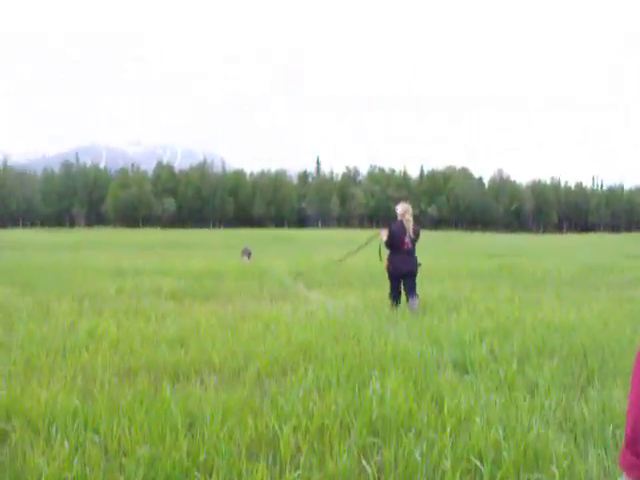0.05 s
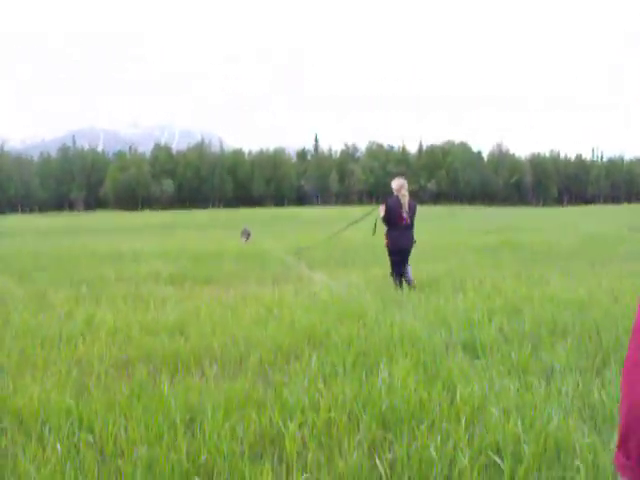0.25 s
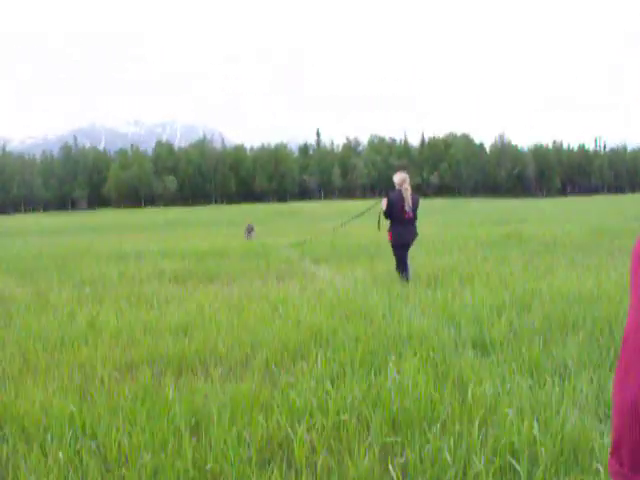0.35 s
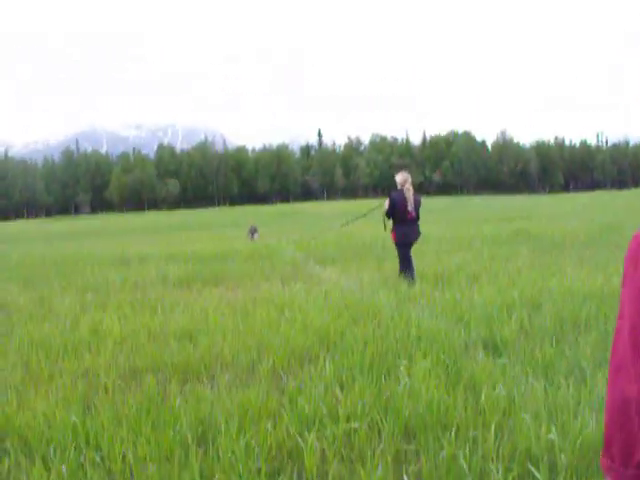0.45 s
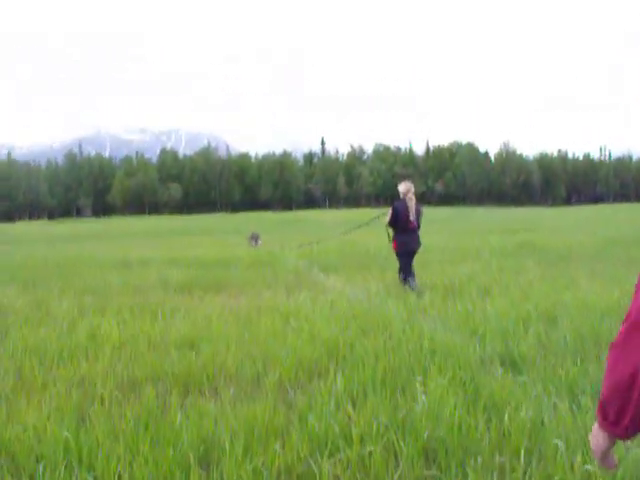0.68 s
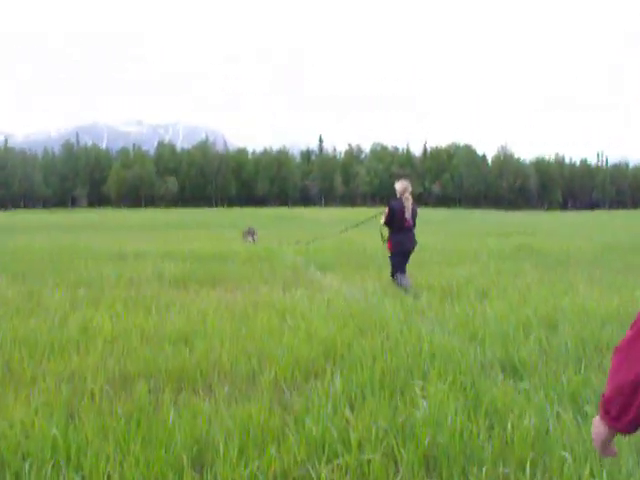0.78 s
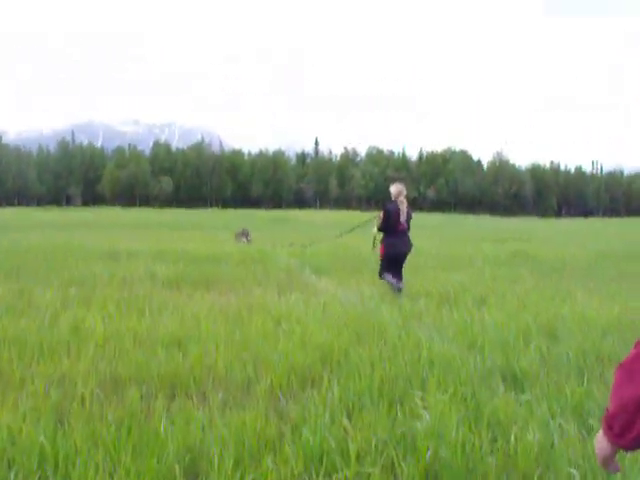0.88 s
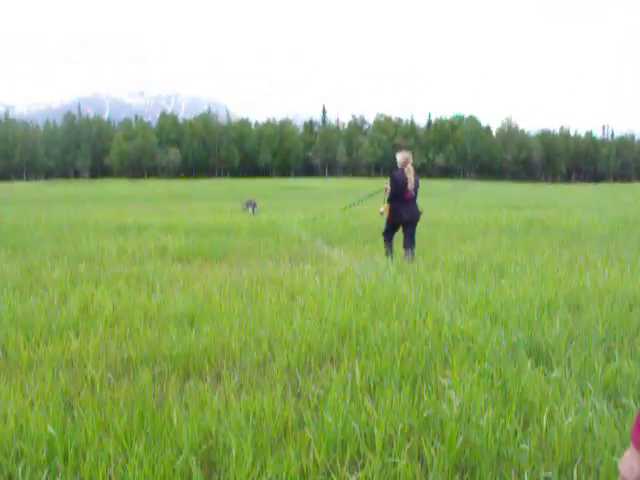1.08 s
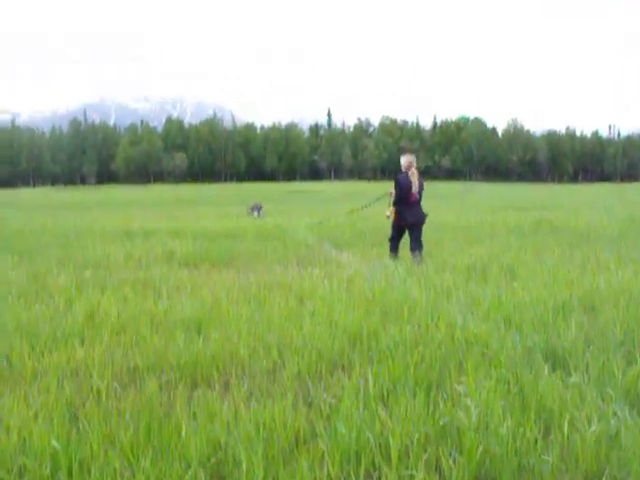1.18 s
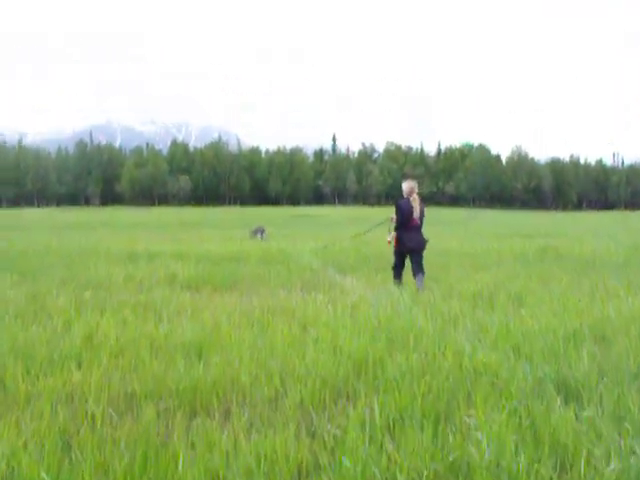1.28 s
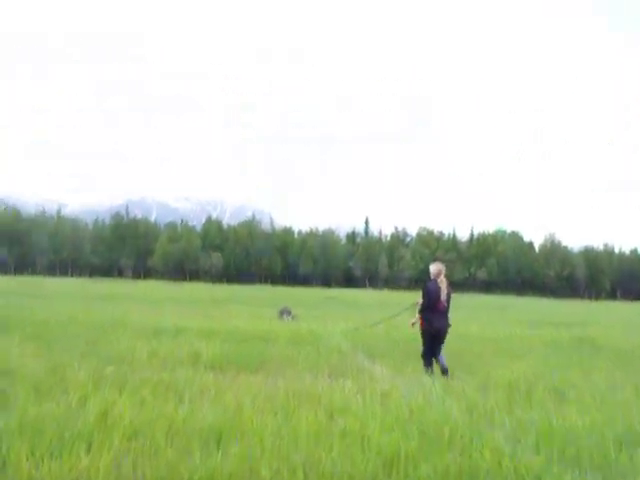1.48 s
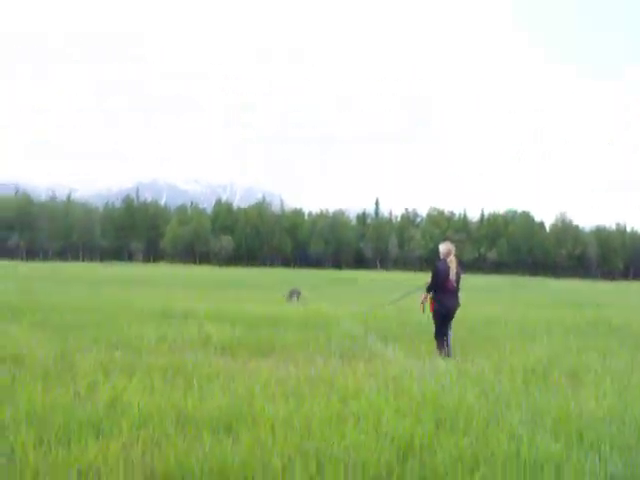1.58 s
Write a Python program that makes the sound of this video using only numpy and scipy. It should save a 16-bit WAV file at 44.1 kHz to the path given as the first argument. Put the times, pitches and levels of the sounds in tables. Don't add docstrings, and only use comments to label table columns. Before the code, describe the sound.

Grass stems scratch and snap right beside a cheap camera microphone, first two harsh bursts, then a softer brush and small flicks, over a constant grassy hiss and thin buzz, with faint bird whistles outdoors.

```python
import sys
import numpy as np
from scipy import signal
from scipy.fft import rfft, irfft, next_fast_len
from scipy.io import wavfile
from scipy.ndimage import uniform_filter1d, map_coordinates

SR = 44100
rng = np.random.default_rng(int(sys.argv[2]) if len(sys.argv) > 2 else 0)


def natural_amplitude(level_db):
    exponent = np.asarray(level_db, float) / 20
    return 10 ** exponent


def wrap_up_sound(samples):
    columns = np.atleast_2d(samples).T
    tamed = np.clip(columns, -1, 1)
    steps = np.round(tamed * 32767).astype(np.int16)
    wavfile.write(sys.argv[1], SR, steps)


N = 72765

# pitch_hz, level_db
BRIGHT_MODES = [(4100, -7.5), (4450, -2), (4850, 1), (5170, -1)]
# pitch_hz, gain_db
SHELL_THINNING = [(300, -25), (900, -4), (1700, -13.5), (2100, 2)]
# centre_s, peak_db
STEM_CRACKS = [(.24233, 2), (.24789, 1), (.2497, -4), (.27302, -6), (.27748, -5), (.40425, -.5),
               (.5324, -1), (.5336, .5), (.53644, -4), (.53921, 1), (.54073, 0), (.54345, -3.5),
               (.54537, -1), (.5482, -8), (.55007, -10), (.55687, -8), (.56054, -14), (.56542, -14),
               (.9641, -3.5), (.97086, -5.5), (1.181, -10), (1.64464, -12), (1.6501, -16)]


def unit(x):
    return x / np.sqrt(np.mean(x ** 2) + 1e-20)


def coloured(x, points):
    size = next_fast_len(N + 8192)
    hz, db = np.transpose(points)
    log_hz = np.log(np.fft.rfftfreq(size, 1 / SR) + 1)
    gain = natural_amplitude(np.interp(log_hz, np.log(hz), db))
    return irfft(rfft(x, size) * gain, size)[:N]


def wobble(rate):
    knots = rng.standard_normal(int(N * rate / SR) + 4)
    return map_coordinates(knots, [np.arange(N) * rate / SR])


def add(track, s, x):
    part = track[max(round(s * SR), 0):][:len(x)]
    part += x[:len(part)]


def buzz():
    # multiple of the buffer rate, level_db
    tones = [(2, -61.5), (4, -59), (5, -56), (6, -58), (7, -62), (8, -72.5)]
    buffer_samples, whine_hz, whine_db = 512, 5010, -55
    n = np.arange(N)
    low = np.zeros(N)
    for k, db in tones:
        phase = 2 * np.pi * (round(k) * n / buffer_samples + rng.random())
        low += natural_amplitude(db + 0.53 * wobble(8.9)) * np.sin(phase)
    whine = natural_amplitude(whine_db + 0.7 * wobble(1.9)) * np.sin(2 * np.pi * whine_hz * n / SR)
    return np.sqrt(2) * (low + whine)


def wind():
    # centre_s, level_db, pitch_hz
    bumps = [
        (0.22, -33.5, 46),
        (1.21, -40, 30),
        (1.421, -38.5, 27.5),
        (1.57, -47, 29.3),
        (1.62, -41, 40),
    ]
    out = np.zeros(N)
    for s, db, hz in bumps:
        cycles = np.arange(-SR // 20, SR // 20) / SR * hz
        add(out, s - .05, natural_amplitude(db) * np.exp(-3 * cycles ** 2) * np.sin(-2 * np.pi * cycles))
    return out


def birds():
    # start_s, length_s, start_hz, end_hz, level_db
    calls = [
        (.66, .05, 4900, 5350, -48),
        (.74, .04, 4850, 5350, -48),
        (.838, .025, 5330, 5330, -46),
        (.915, .022, 5350, 5280, -46),
        (1.252, .025, 5200, 5180, -44),
        (1.34, .05, 5450, 4500, -46),
        (1.455, .045, 5200, 4250, -47),
        (1.558, .055, 5450, 4180, -45),
    ]
    out = np.zeros(N)
    for s, length, start_hz, end_hz, db in calls:
        u = np.linspace(0, 1, round(length * SR))
        hz = end_hz + (start_hz - end_hz) * (1 - u) ** 1.5
        whistle = np.sin(2 * np.pi * np.cumsum(hz) / SR)
        add(out, s, natural_amplitude(db) * np.sin(np.pi * u) ** .6 * whistle)
    return out * natural_amplitude(3 + 3 * wobble(90))


def grass():
    # time_s, level_db
    swell = [
        (0.0, -36.5),
        (0.294, -40),
        (0.394, -35),
        (0.776, -37),
        (1.015, -38.5),
        (1.138, -34.5),
        (1.378, -37),
        (1.65, -37),
    ]
    # pitch_hz, gain_db
    hiss_colour = [(25, -4.5), (110, -7), (500, -3.5), (1050, -1.5), (2100, -6), (3700, -6.5), (4700, -6.5),
                   (5500, -2.5)]
    crackle = rng.standard_normal(N) * natural_amplitude(1.32 * wobble(400))
    z = signal.stft(crackle, nperseg=512)[2]
    patches = uniform_filter1d(rng.standard_normal(z.shape), size=6, axis=0)
    patches = uniform_filter1d(patches, size=8, axis=1)
    patchy = signal.istft(z * natural_amplitude(1.18 * unit(patches)), nperseg=512)[1][:N]
    hiss = coloured(patchy, hiss_colour + [(6000, -57)])
    s, db = np.transpose(swell)
    return unit(hiss) * natural_amplitude(np.interp(np.arange(N) / SR, s, db) + 1.5 * wobble(11.58))


def ringing(modes, t, t60, rise):
    scatter_db, detune = 2.5, .025
    chance = rng.standard_normal((len(modes), 2))
    tones = np.zeros(len(t))
    for (hz, db), (a, b) in zip(modes, chance):
        tones += natural_amplitude(db + scatter_db * a) * np.sin(2 * np.pi * hz * (1 + detune * b) * t)
    return (1 - np.exp(-t / rise)) * natural_amplitude(-60 * t / t60) * tones


def gripped(hz):
    # pitch_hz, level_db
    dull_modes = [(2200, -6), (2450, -2), (2670, 0), (2920, -1), (3200, 0), (3420, -8)]
    grip_wide_hz, grip_db = 520, 8
    return [(f, db - grip_db * ((f - hz) / grip_wide_hz) ** 2) for f, db in dull_modes]


def shell_bass(low):
    return coloured(low, [(120, -23.5), (350, -1.5)])


def knocks():
    # pitch_hz, level_db
    knock_modes = [(330, -10), (630, -6), (1000, 0), (1170, -4)]
    # pitch_hz, level_db
    thump_modes = [(270, -6), (350, -4), (630, 0), (1000, -10), (1250, -5)]
    # start_s, peak_db
    taps = [
        (0.2438, -15.5),
        (0.35, -27.5),
        (.366, -32.5),
        (0.726, -25.5),
        (0.966, -25),
        (1.009, -23.5),
        (1.213, -35),
        (1.237, -21.5),
        (1.646, -20),
    ]
    # start_s, peak_db
    heavy_blows = [
        (.4974, -25),
        (0.502, -13.5),
    ]
    out, t = np.zeros(N), np.arange(SR // 20) / SR
    for modes, events in ((knock_modes, taps), (thump_modes, heavy_blows)):
        for s, db in events:
            knock = ringing(modes, t, 0.023, 0.00051)
            add(out, s - .001, natural_amplitude(db) * knock / np.abs(knock).max())
    return shell_bass(out)


def scrapes():
    # start_s, length_s, level_db, grip_hz
    rubs = [(0.25, 0.011, -31, 2300), (.326, .022, -38, 2900), (0.277, 0.011, -35, 2600),
            (.296, 0.025, -31.5, 2770), (0.385, 0.031, -28, 2800), (0.433, 0.0062, -42.5, 3020),
            (0.964, 0.014, -37.5, 2640), (0.979, 0.019, -32, 2100), (0.996, 0.034, -34, 2400),
            (1.022, 0.047, -29, 2950), (1.103, 0.013, -41, 2680), (1.168, 0.017, -32, 2940)]
    out, t = np.zeros(N), np.arange(SR // 50) / SR
    for s, length, db, hz in rubs:
        u = np.linspace(0, 1, round(length * SR))
        noise, patches = rng.standard_normal((2, SR // 10))
        grit = noise * natural_amplitude(3.1 * unit(uniform_filter1d(patches, size=40)))
        push = np.sin(np.pi * u) ** 0.77 * grit[:len(u)]
        dull, bright = [unit(np.convolve(push, ringing(modes, t, .012, 0.00022)))
                        for modes in (gripped(hz), BRIGHT_MODES)]
        add(out, s, natural_amplitude(db) * (dull + natural_amplitude(-6) * bright))
    return coloured(out, SHELL_THINNING)


def cracks():
    kicked_hz = (2800, 4800)
    shares = (.56, .44)
    rise_s, fall_s = .0003, .00055
    out, hush = np.zeros(N), np.zeros(N)
    u = np.arange(-66, 66) / SR
    shape = np.exp(-(u / np.where(u < 0, rise_s, fall_s)) ** 2)
    kick = shape * (shares @ np.cos(2 * np.pi * np.outer(kicked_hz, u)))
    for s, db in STEM_CRACKS:
        add(out, s + u[0], -natural_amplitude(db) * kick)
        add(hush, s + u[0], shape)
    return out, np.clip(hush, 0, 1)


def slips():
    # loudest_s, peak_db, bright_over_dull_db, length_ms
    catch = [(0.2423, -3, 2, 1.2), (0.2478, -4, 2, 0.8), (0.2496, -7, 0, 0.7), (0.2554, -18, -4, 2.3),
             (0.2604, -22, -12, 0.9), (0.2698, -18, -3, 2.6), (0.2731, -9, -5, 1.3),
             (0.2753, -13, -10, 0.8), (0.2777, -9, -3, 1.8), (0.2841, -20, -10, 1.9),
             (0.2894, -15, -15, 1.2), (0.2988, -12, -7, 1.1), (0.3019, -15, -15, 0.8),
             (0.3044, -10, -9, 1.6), (0.3083, -7, -14, 1.5), (0.312, -20, -10, 0.9),
             (0.3142, -16, -16, 0.9), (0.3185, -14, -11, 0.8), (0.3209, -11, -9, 1.1),
             (0.3489, -16, -12, 1.0), (0.3757, -12, -14, 2.3), (0.3925, -8, -17, 3.5),
             (0.3973, -18, -19, 0.8), (0.3997, -10, -14, 1.2), (0.4043, -3, -14, 1.3),
             (0.408, -7.5, -16, 1.0), (0.4105, -19, -8, 0.7), (0.413, -19, -17, 1.2),
             (0.4165, -23, -10, 1.1), (0.4237, -17, -14, 1.3)]
    tear = [(.4922, -19, -11, .8), (.4942, -14, -9, 1), (.4965, -2, -7, 1.5), (.4983, -3, -6, 1.5),
            (.5011, -2, -3, 1.5), (.5028, -3, -4, 1), (.5059, -9, -10, 1), (.5093, -7, -4, 1.6),
            (.5112, -9, -6, 1), (.514, -12, -8, 1.2), (.5169, -17, -7, 1), (.528, -12, -9, 2),
            (.5324, -4, -6, 1), (.5335, -4, -5, .6), (.5364, -8, -5, .7), (.5391, -4, -5, .5),
            (.5407, -4.5, -5, .4), (.5433, -7, -5, .4), (.5453, -4.5, -5, .4), (.5481, -11, -4, .6),
            (.5502, -14, -6, .5), (.5525, -17, -8, 2), (.5569, -13, -3, .4), (.5606, -18, -2, .4),
            (.5654, -21, -1, .6)]
    brush = [(0.9641, -9, 4, 1.0), (0.9708, -12, 2, 0.9), (0.9727, -14, 0, 0.8), (0.9769, -19, -2, 1.0),
             (0.9874, -15, -4, 2.8), (0.9924, -21, -6, 0.9), (1.003, -19, -6, 1.1), (1.0063, -14, -8, 1.4),
             (1.0116, -21, -2, 1.9), (1.0181, -16, -6, 1.2), (1.0226, -18, -4, 0.9), (1.028, -19, -4, 1.5),
             (1.0318, -19, -4, 1.2), (1.0361, -21, -6, 1.8), (1.0414, -21, -9, 0.9), (1.0473, -18, -1, 3.6),
             (1.0515, -18, -5, 0.8), (1.055, -16, -4, 1.3), (1.0762, -17, -6, 2.0), (1.0803, -12, -4, 1.1)]
    flick = [
        (1.1111, -21, -8, 2.9),
        (1.171, -12, -11, 1.0),
        (1.1745, -14, -6, 0.7),
        (1.1781, -20, -13, 0.7),
        (1.181, -14, -4, 1.0),
        (1.1855, -21, 0, 0.8),
        (1.6447, -12, 4, 1.3),
    ]
    grips_hz = [
        [2490, 2690, 2950, 2490, 2430, 2370, 2570, 2430, 2440, 2950, 2840, 3160, 2750, 2640, 3060, 2940, 2710,
         2620, 2800, 2920, 3100, 2510, 2900, 2840, 2870, 2800, 3160, 3130, 3090, 3000],
        [2730, 2610, 3080, 2730, 3200, 2720, 3010, 2590, 2470, 3300, 2500, 2390, 2670, 2650, 2700, 2800, 2750,
         2830, 2780, 2670, 2810, 2440, 2430, 2560, 2510],
        [2790, 2760, 3050, 2710, 2470, 2220, 3290, 2730, 2570, 2710, 2990, 2850, 3110, 3020, 2720, 3320, 2980,
         2930, 2750, 3140],
        [2800, 2770, 2970, 2780, 2860, 3020, 3280],
    ]
    # pitch_hz, level_db
    deep_modes = [(1000, -0.5), (1300, -34.5), (1700, 1.5)]
    deep_levels = [-19, -23.5, -9, -18.5]
    forces = [0, .5, .5, 1]
    drags = [-17, -14, -11, -13]
    dull_t60, bright_t60, deep_t60, drag_t60 = .009, .005, .015, .03
    lead, snap, damping_db = .008, 4, 14
    left_db = -2.5
    high, low, t = np.zeros(N), np.zeros(N), np.arange(SR // 20) / SR
    strokes = zip((catch, tear, brush, flick), deep_levels, forces, drags, grips_hz)
    for stroke, deep_db, force_db, drag_db, grips in strokes:
        for (s, db, bright_db, ms), hz in zip(stroke, grips):
            db += left_db * any(abs(s - c) < .0003 for c, _ in STEM_CRACKS)
            swell = np.exp(-.5 * ((t - lead) / (0.00028 * ms)) ** 2)
            tail_db = drag_db + 10.0 * natural_amplitude(bright_db) - 60 * (t - lead) / drag_t60
            push = (swell + natural_amplitude(tail_db) * (t > lead)) * rng.standard_normal(len(t))
            push[round(lead * SR)] += snap * natural_amplitude(bright_db) * np.sqrt(np.sum(swell ** 2))
            damp = np.clip(.6 - .4 * bright_db / damping_db, .5, 1)
            parts = []
            for modes, t60 in ((gripped(hz), dull_t60), (BRIGHT_MODES, bright_t60), (deep_modes, deep_t60)):
                ring = ringing(modes, t, damp * t60, damp * t60 / 12)
                part = signal.fftconvolve(push, ring)[:len(t)]
                parts.append(part / np.abs(part).max())
            dull, bright, deep = parts
            sound = dull + natural_amplitude(bright_db + 2.5) * bright
            power = 2 * np.abs(uniform_filter1d(sound ** 2, size=30))
            gain = natural_amplitude(db + force_db) / np.sqrt(power.max())
            start = s - np.argmax(power) / SR
            add(high, start, gain * sound)
            add(low, start, gain * natural_amplitude(deep_db) * deep)
    return coloured(high, SHELL_THINNING) + shell_bass(low)


def scene():
    crack, hush = cracks()
    shell = (slips() + scrapes()) * (1 - hush) + crack + knocks() * (1 - hush)
    return (shell + grass() + wind() + birds() + buzz())[None]


def low_pass(x):
    return signal.sosfilt(signal.butter(12, 15910, fs=SR, output="sos"), x)


def record(dry):
    # pitch_hz, gain_db
    playback = [(5150, -0.5), (5512, -12.5), (5850, -15), (6200, -36), (6450, -49), (6900, -130)]
    slower, converter_top, playback_top, offset = 4, .92, .72, -.0026
    slow = np.zeros(N)
    slow[::slower] = slower * np.clip(dry[0, ::slower], -converter_top, converter_top)
    x = np.clip(coloured(slow, playback) + offset, -playback_top, playback_top)
    return low_pass(x[None])


dry = scene()
out = record(dry)
wrap_up_sound(out)
```